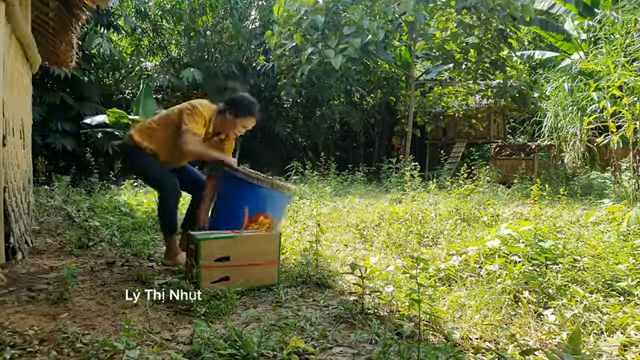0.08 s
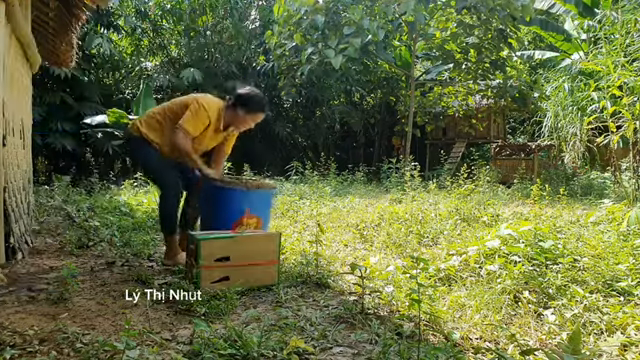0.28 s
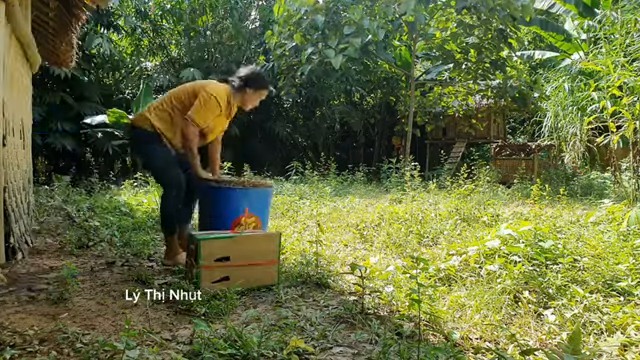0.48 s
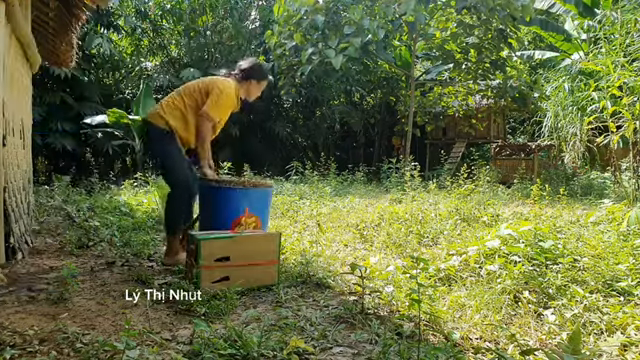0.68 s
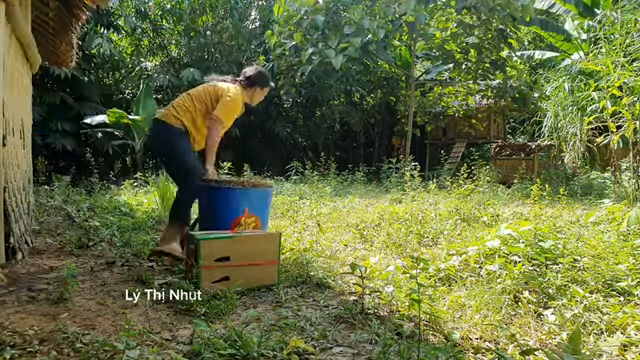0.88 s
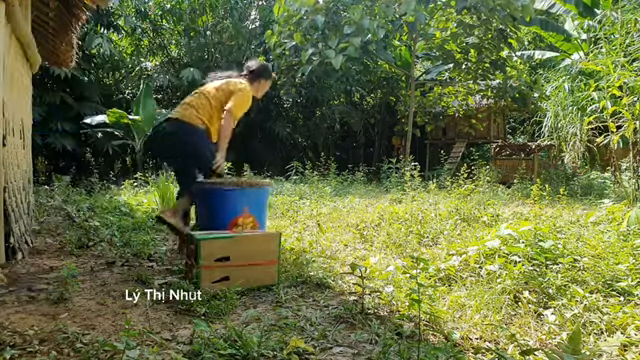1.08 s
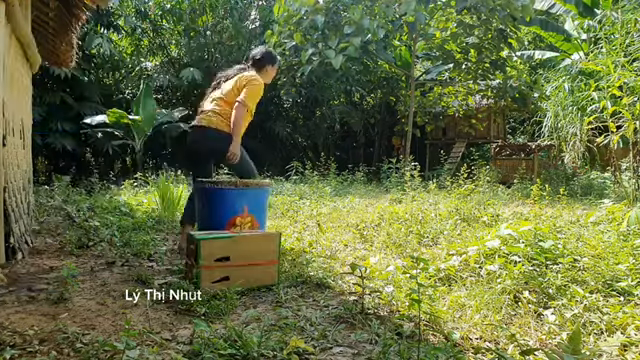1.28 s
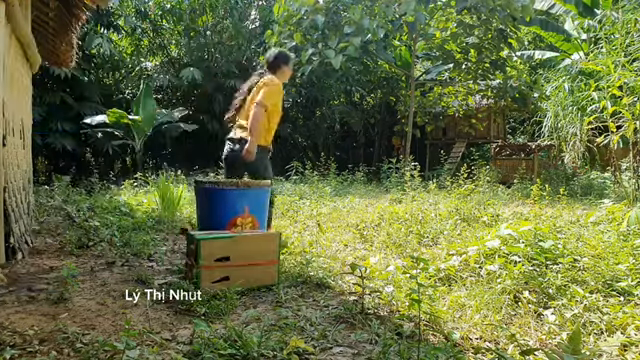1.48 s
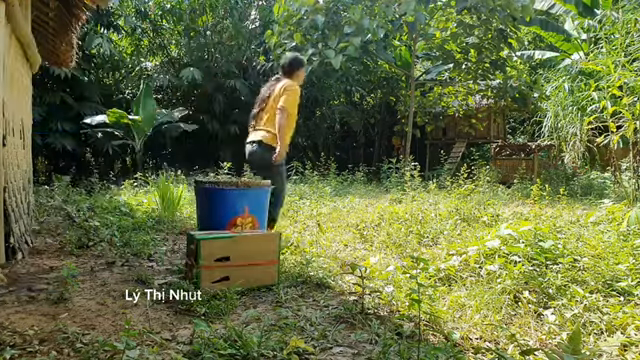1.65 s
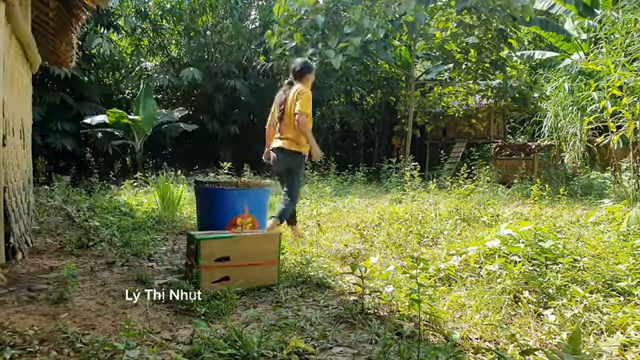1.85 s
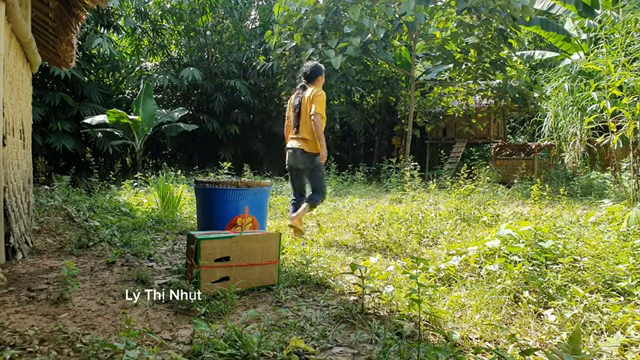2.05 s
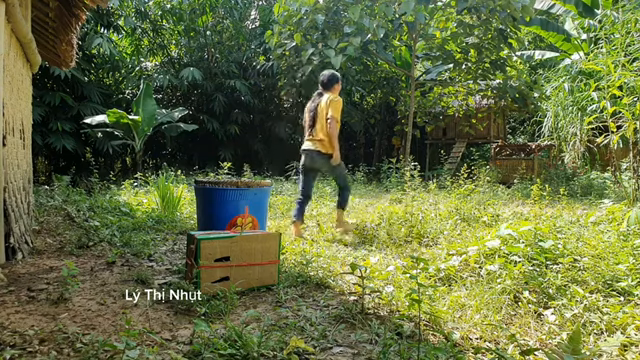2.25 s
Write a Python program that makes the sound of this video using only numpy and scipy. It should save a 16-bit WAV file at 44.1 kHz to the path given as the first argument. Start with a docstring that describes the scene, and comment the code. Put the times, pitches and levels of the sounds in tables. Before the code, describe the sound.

A loaded plastic tub lands with a dull, hollow double knock on a wooden crate and scrapes briefly, then a few soft footsteps thud and swish away over grass; quiet yard, faint insects, microphone some metres off.

```python
"""A grassy yard: a loaded tub rocks down onto a hollow crate, then shoes thud, scuff and swish away.
Behind them lie air and a lumpy low rumble, both coloured noise, and two bands of throbbing insect clicks.
Tub and shoes are smooth pushes that ring decaying modes; a dry stem snaps through broad resonances.
Scuffs are bursts of resonant grit, and the swish is a bright mass of tiny blade clicks."""
import sys
import numpy as np
from scipy import signal
from scipy.fft import rfft, irfft
from scipy.io import wavfile
from scipy.ndimage import uniform_filter1d

SR = 44100
rng = np.random.default_rng(int(sys.argv[2]) if len(sys.argv) > 2 else 0)


def persist_wave(psi):
    """Save psi, clipped to +-1, as 16-bit WAV."""
    counts = np.round(np.clip(psi, -1, 1) * 32767).astype(np.int16)
    wavfile.write(sys.argv[1], SR, np.atleast_2d(counts).T)


def volts_from_db(level):
    """Convert decibel levels to linear amplitude ratios."""
    exponent = np.asarray(level, float) / 20
    return 10 ** exponent


N = 103635  # samples

# yard air colour: f/Hz, relative level/dB per Hz
AIR_COLOUR = [(100, -16), (160, -0.5), (250, -2.5), (400, -10.5), (630, -12), (830, -18.5), (1600, -20),
              (2600, -27), (3900, -41.5), (6000, -41.5), (8500, -44), (15000, -40)]
# rumble colour: f/Hz, relative level/dB per Hz
RUMBLE_COLOUR = [(15, -20.5), (30, -22.5), (50, -1.5), (70, 2.5), (90, -1.5), (125, -4.5), (150, -13),
                 (185, -29), (300, -73)]
# rumble rising and falling: t/s, level/dB
RUMBLE_LEVEL = [(0, -63), (.025, -59.5), (.06, -46), (.11, -55.5), (.3, -55), (.45, -54), (.6, -59.5),
                (.68, -54.5), (.8, -61), (1.0, -53), (1.28, -53.5), (1.4, -55.5), (1.72, -54.5),
                (1.79, -54.5), (1.88, -54.5), (2.08, -58.5), (2.19, -50), (2.28, -62), (2.35, -54)]
# insect voices: f/Hz, width/Hz, level/dB, rate/clicks per s, throb/Hz, throb depth/0-1
INSECT_VOICES = [(7290, 200, -91.5, 270, 18, 0.32), (6960, 240, -94.5, 300, 14, 0.2),
                 (10070, 350, -96.5, 320, 6.5, 0.8), (11400, 1500, -97.5, 450, 48, 0.3),
                 (11100, 250, -99, 700, 13, 0.3)]
# grass and cloth swish rising and falling: t/s, level/dB
SWISH_LEVEL = [(0, -86), (.1, -87.5), (.13, -91.5), (.22, -71), (.24, -80.5), (.285, -75.5), (.3, -85),
               (.33, -77), (.46, -90), (.78, -90), (.8, -80.5), (.88, -91), (.97, -83), (.99, -96),
               (1.02, -81.5), (1.05, -89), (1.07, -82.5), (1.11, -91.5), (1.2, -84.5), (1.22, -95),
               (1.27, -80.5), (1.3, -90), (1.32, -77.5), (1.335, -80), (1.43, -75.5), (1.45, -79.5),
               (1.54, -74.5), (1.56, -69), (1.62, -84), (1.7, -76.5), (1.715, -82), (1.83, -87),
               (1.88, -78), (2.015, -84), (2.04, -80), (2.09, -81.5), (2.115, -74), (2.14, -81),
               (2.25, -89.5), (2.35, -88)]
# swish colour: f/Hz, relative level/dB per Hz
SWISH_COLOUR = [(1000, -44), (3000, -10), (6000, -13), (8700, -13.5), (9700, 0.5), (11500, 0.5),
                (14800, -1.5), (15050, -28)]
# gritty scuffs: start t/s, length/s, level before the swell/dB, centre f/Hz, width of each resonance/Hz
SCUFF_STROKES = [(.157, .03, -70, 1760, 300), (.196, 0.041, -66.5, 1670, 890), (.198, .03, -65, 1040, 700),
                 (.240, .018, -76, 1900, 910), (0.26, 0.062, -76, 1580, 820),
                 (.317, 0.021, -67.5, 1390, 1300), (0.329, 0.083, -73.5, 1850, 1510),
                 (0.308, 0.16, -59.5, 197, 149), (0.379, 0.06, -71, 550, 350),
                 (0.493, 0.022, -80, 1400, 200), (.797, 0.027, -81.5, 2260, 1500),
                 (.945, 0.025, -78, 1660, 302), (0.949, 0.059, -83, 2200, 1800),
                 (0.954, 0.036, -74, 550, 350), (1.091, 0.016, -79, 1340, 250),
                 (1.186, 0.022, -72, 670, 149), (1.353, 0.021, -67.5, 2450, 700),
                 (1.354, 0.017, -66.5, 1390, 1310), (1.363, 0.028, -76, 3000, 900),
                 (1.385, 0.032, -79.5, 2510, 1200), (1.406, 0.28, -85.5, 1790, 1600),
                 (1.42, .16, -71.5, 260, 200), (1.493, 0.058, -83.5, 3600, 500),
                 (1.553, 0.039, -82, 2470, 1500), (1.641, 0.037, -88, 4300, 404),
                 (1.675, 0.025, -84, 3700, 500), (1.68, 0.039, -77.5, 2950, 1100),
                 (1.64, 0.09, -92, 4500, 2000), (1.956, 0.025, -73, 2440, 1100),
                 (1.964, 0.034, -70.5, 1380, 302), (1.945, 0.031, -66.5, 567, 90),
                 (1.95, 0.041, -61.5, 290, 59.6), (1.96, .02, -72.5, 836, 149),
                 (2.064, 0.0082, -72, 1950, 1980), (2.072, 0.011, -59.5, 1050, 700),
                 (2.081, 0.015, -66.5, 1574, 500), (2.062, .028, -76.5, 3590, 60),
                 (2.10, 0.032, -75, 2460, 1140)]
# dry stems snap (a row past the end stays silent): t/s, drive level/dB
STEM_SNAPS = [(2.0736, -50.5), (2.6, -64)]
# snap resonances: f/Hz, width/Hz, gain level/dB
SNAP_RESONANCES = [(1100, 430, 14), (2200, 770, -10), (4900, 740, -3), (7160, 1000, -19),
                   (11000, 1800, -1.5), (13800, 1600, -6)]
# soles meet the ground; the last row is the stem snapping underfoot: t/s, peak level/dB, contact/ms
FOOTFALLS = [(.7945, -51.5, 2.85), (.7955, -56.5, 1.14), (.887, -44, 10.6), (.961, -49, 9),
             (1.188, -61, 2.1), (1.3205, -42, 4.26), (1.3255, -46, 3.7), (1.330, -38.5, 3.16),
             (1.334, -45.5, 4), (1.3562, -41, 1.83), (1.3594, -31, 2.5), (1.3622, -52, 1.56),
             (1.3652, -39.5, 3.2), (1.948, -52, 4.4), (1.953, -54.5, 1.7), (1.963, -46.5, 2.17),
             (1.967, -53.5, 1.07), (1.971, -48, 1.85), (1.980, -58, 2), (2.0733, -32.5, 1.98)]
# modes of sole and soil: f/Hz, relative level/dB, t60/s
SOLE_MODES = [(85, 10.5, 0.028), (215, 1.5, 0.028), (290, -3.5, 0.055), (437, 3, 0.02), (550, 3, 0.023),
              (700, 2.5, 0.016), (874, 2, .025), (1106, -3, 0.072), (1480, -30.5, 0.013),
              (2000, -27, 0.029), (2450, -9, 0.039)]
# tub meets crate: t/s, peak level/dB, contact/ms
TUB_BLOWS = [(.2028, -39, 2.0), (.2050, -29.5, 2.6), (.2088, -36, 2.6), (.2115, -41, 2.0),
             (.2140, -23.5, 5.4), (.2445, -43, 5.5), (.3225, -60, 1.0)]
# modes of crate and tub: f/Hz, relative level/dB, t60/s
CRATE_MODES = [(90, -6, 0.14), (143, 4.5, 0.034), (230, 2, 0.029), (318, 5, 0.012), (500, 0.5, 0.03),
               (623, 6, 0.022), (980, -26, 0.033), (1500, -34, .04), (1760, -20, .035), (2050, -33, .035)]


def evened(x):
    """Scales a sound to rms 1."""
    return x / np.sqrt(np.mean(x ** 2) + 1e-20)


def curve(points):
    """Draws a gain along time from (t/s, level/dB) rows."""
    s, db = np.transpose(points)
    return volts_from_db(np.interp(np.arange(N) / SR, s, db))


def colour(x, points):
    """Filters a sound by (f/Hz, level/dB) rows, on a log frequency scale, to rms 1."""
    f, db = np.transpose(points)
    hz = np.fft.rfftfreq(len(x), 1 / SR)
    level = np.interp(np.log(hz + 1), np.log(f), db, -120, -120)
    return evened(irfft(rfft(x) * volts_from_db(level), len(x)))


def slow(seconds):
    """Drifts at random with rms 1: noise averaged twice over the given time."""
    size = max(round(seconds * SR), 2)
    once = uniform_filter1d(rng.standard_normal(N), size)
    return evened(uniform_filter1d(once, size))


def grit(per_s, spread_db, count):
    """Scatters sparse clicks of either sign and uneven size over count samples."""
    chance = rng.random(count)
    excess = rng.exponential(1, count)
    sign = rng.choice([-1., 1.], count)
    return (chance < per_s / SR) * sign * volts_from_db(spread_db * np.minimum(excess, 5))


def resonate(x, hz, width):
    """Passes a sound through one resonance of gain 1: shift down to 0 Hz, smooth, shift back."""
    turn = np.exp(2j * np.pi * hz * np.arange(len(x)) / SR)
    r = np.exp(-np.pi * width / SR)
    return 2 * (turn * signal.lfilter([1 - r], [1, -r], x / turn)).real


def add(mix, s, sound):
    """Mixes a sound in at time s, cut at the end of the mix."""
    part = mix[round(s * SR):][:len(sound)]
    part += sound[:len(part)]


def air():
    """Distant yard noise whose level drifts in patches of time and frequency."""
    level_db, patch_db = -73.5, 1.5
    grid = dict(nperseg=512, noverlap=384)
    z = signal.stft(colour(rng.standard_normal(N), AIR_COLOUR), **grid)[2]
    across_hz = uniform_filter1d(rng.standard_normal(z.shape), 6, 0)
    patches = evened(uniform_filter1d(across_hz, 20, 1))
    return volts_from_db(level_db) * signal.istft(z * volts_from_db(patch_db * patches), **grid)[1][:N]


def rumble():
    """Low noise, made lumpy by a random swing in level before it is coloured."""
    lump_db, lump_s = 3, 0.026
    lumpy = rng.standard_normal(N) * volts_from_db(lump_db * slow(lump_s))
    return evened(colour(lumpy, RUMBLE_COLOUR)) * curve(RUMBLE_LEVEL)


def insects():
    """Quick uneven clicks ring short high resonances, and each voice throbs."""
    out, t = np.zeros(N), np.arange(N) / SR
    for hz, width, db, per_s, throb_hz, depth in INSECT_VOICES:
        turns = np.cumsum(per_s * (1 + 0.12 * slow(0.0053))) / SR
        clicks = np.diff(np.floor(turns), prepend=0)  # one click per whole turn
        clicks = clicks * (1 + 1.2 * rng.standard_normal(N))
        clicks = clicks + 0.066 * rng.standard_normal(N)  # faint hiss between clicks
        phase = throb_hz * t + 0.36 * slow(0.38) + rng.random()
        throb = 1 + depth * np.sin(2 * np.pi * phase)
        ringing = resonate(resonate(clicks * throb, hz, width), hz, width * 1.7)
        out += volts_from_db(db) * evened(ringing)
    return out


def swish():
    """Grass and cloth brush past: dense tiny blade clicks, coloured bright, with a fluttering level."""
    blades_per_s, spread_db = 14000, 1.5
    blades = colour(grit(blades_per_s, spread_db, count=N), SWISH_COLOUR)
    flutter = volts_from_db(1.8 * slow(.008))  # dB rms, s
    return blades * curve(SWISH_LEVEL) * flutter


def scuffs():
    """Grit through a resonance with a steeper upper side, swelling and fading."""
    grit_per_s, spread_db = 2400, 2.5
    lean = 0.71  # below 1 peaks early
    out = np.zeros(N)
    for s, length, db, hz, width in SCUFF_STROKES:
        u = np.arange(0, length, 1 / SR) / length
        drive = grit(grit_per_s, spread_db, count=14000) + 0.4 * rng.standard_normal(14000)
        dull = signal.butter(2, hz + width, fs=SR, output="sos")
        body = signal.sosfilt(dull, resonate(resonate(drive, hz, width), hz, width))
        body = body[2000:][:len(u)]  # skips the filters' settling
        swell = np.sin(np.pi * u[:len(body)] ** lean) ** 1.01
        add(out, s, volts_from_db(db) * evened(body) * swell)
    return out


def snaps():
    """A stem breaks: one sharp click and a short spray of splinters through broad resonances."""
    spray_t60, crack = 0.013, 1.5  # s, click size relative to the spray
    out, t = np.zeros(N), np.arange(2000) / SR
    for s, db in STEM_SNAPS:
        spray = rng.standard_normal(len(t)) * volts_from_db(db - 60 * t / spray_t60)
        drive = spray - crack * volts_from_db(db) * (t == 0)
        sound = sum(volts_from_db(gain_db) * resonate(drive, hz, width) for hz, width, gain_db in SNAP_RESONANCES)
        add(out, s, sound)
    return out


def struck(rows, modes):
    """Each blow is a smooth push and release over its contact time that rings the modes."""
    t, out = np.arange(SR // 4) / SR, np.zeros(N)
    ring = -sum(volts_from_db(db - 60 * t / t60) * np.sin(2 * np.pi * hz * t) for hz, db, t60 in modes)
    for s, db, ms in rows:
        force = np.sin(np.pi * np.clip(t[:800] * 1000 / ms, 0, 1)) ** 2
        sound = np.convolve(ring, np.diff(force))  # the change in force drives the modes
        add(out, s, volts_from_db(db) * sound / abs(sound).max())
    return out


def footfalls():
    """Soles press the ground; short, mostly low modes of sole and soil give the thud. The last knock, at 2.07
    s, is the stem snapping underfoot."""
    return struck(FOOTFALLS, SOLE_MODES)


def tub_on_crate():
    """The loaded tub lands in several contacts that ring the hollow crate."""
    return struck(TUB_BLOWS, CRATE_MODES)


def scene():
    """Sums all sources into one channel."""
    background = air() + rumble() + insects()
    steps = swish() + scuffs() + snaps() + footfalls()
    return (background + steps + tub_on_crate())[None]


def roll_off(x):
    """The treble ends steeply here."""
    return signal.sosfilt(signal.butter(12, 15500, fs=SR, output="sos"), x)


def record(dry):
    """The microphone thins the deep bass, and a steep filter limits the treble."""
    low_hz, edge_hz = 44.6, 15000
    low = signal.butter(2, low_hz, "high", fs=SR, output="sos")
    top = signal.firwin(255, edge_hz, fs=SR)[None]
    mix = signal.oaconvolve(signal.sosfilt(low, dry), top, "same")
    return roll_off(mix)


dry = scene()
out = record(dry)
persist_wave(out)
```